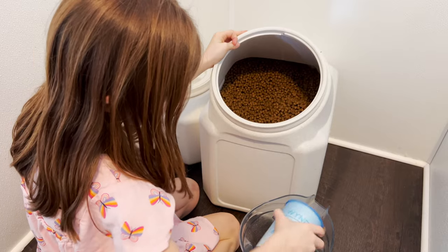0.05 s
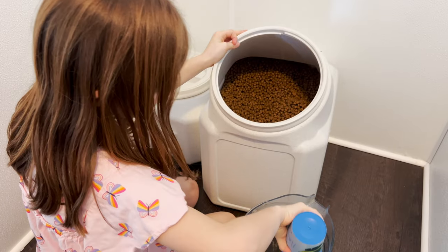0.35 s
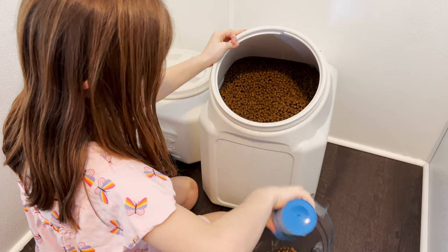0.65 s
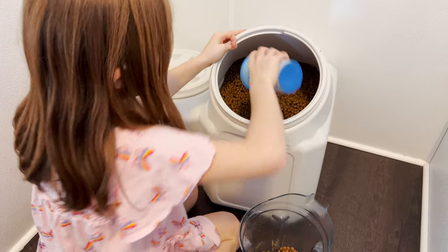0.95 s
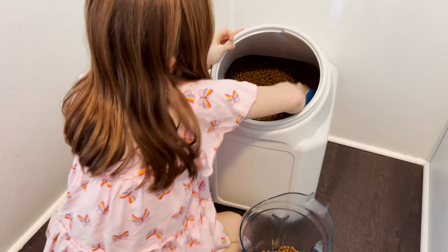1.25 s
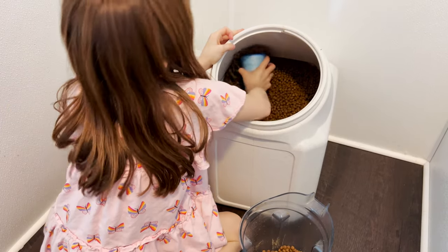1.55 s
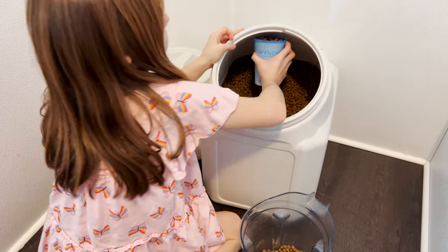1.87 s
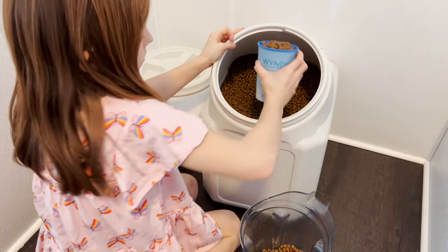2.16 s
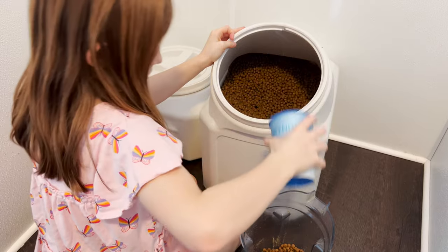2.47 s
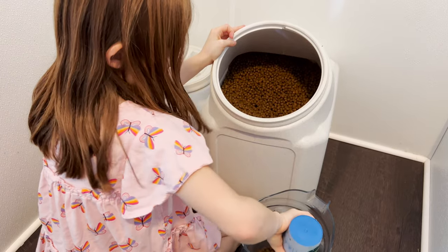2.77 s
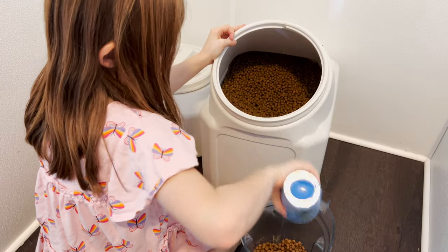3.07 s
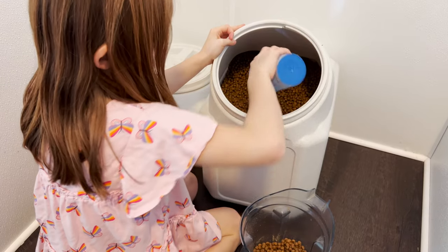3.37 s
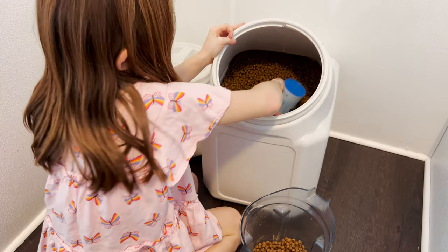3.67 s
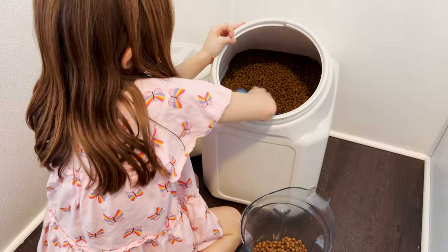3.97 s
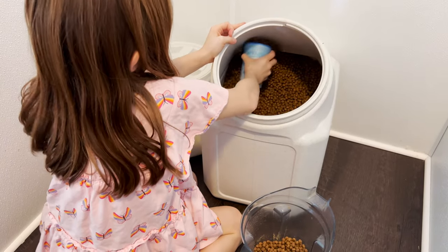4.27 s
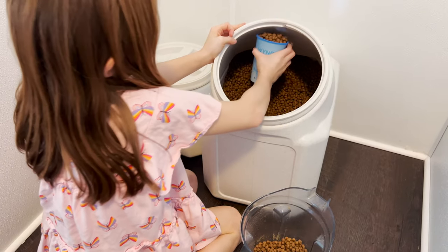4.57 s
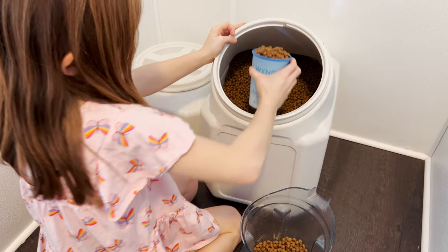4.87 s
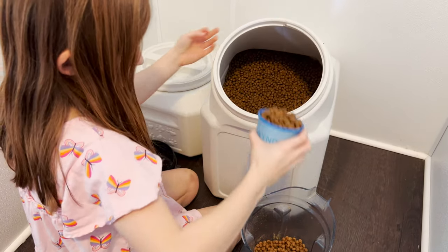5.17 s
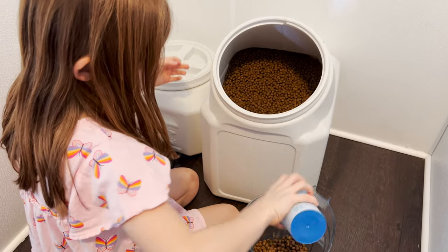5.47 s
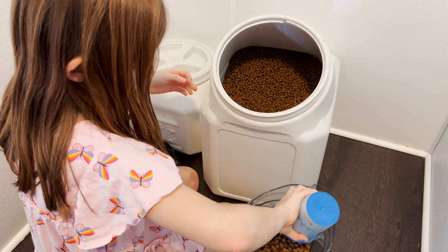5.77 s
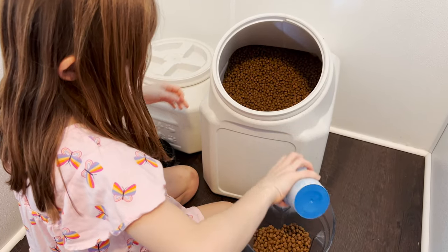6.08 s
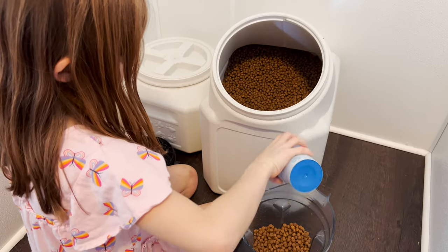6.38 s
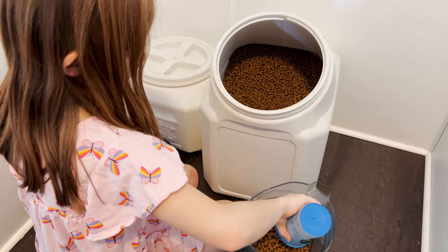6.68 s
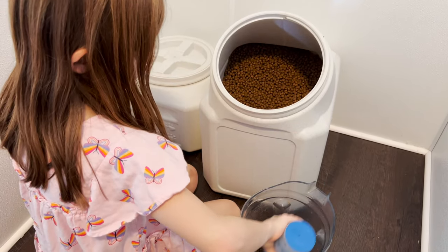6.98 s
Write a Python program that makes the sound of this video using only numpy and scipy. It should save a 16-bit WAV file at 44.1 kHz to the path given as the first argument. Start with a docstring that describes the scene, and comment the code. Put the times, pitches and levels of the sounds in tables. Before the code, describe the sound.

Sharp ticks lead into a clatter as dry kibble is tipped from a plastic cup into a blender jar. The cup digs into a big plastic bin with a hollow, booming crunch, then pours again; a second dig and a third pour follow. Stray pellets tick, and finally the cup knocks on the jar and grinds into the heap. The microphone is close, in a small hard-walled room.

```python
"""Sharp ticks, then a clatter: dry kibble tipped from a plastic cup into a blender jar, close to the
microphone in a small hard-walled room. A child pours three times; the pellets ring the jar and shake it
on the floor. Between pours the cup digs in a big plastic bin: the kibble crunches, the air in the cup
hoots and the bin booms. Stray pellets tick, and at the end the cup knocks on the jar and is pushed into
the heap."""
import sys
import numpy as np
from scipy import signal
from scipy.fft import next_fast_len
from scipy.io import wavfile
from scipy.ndimage import uniform_filter1d

SR = 44100
rng = np.random.default_rng(int(sys.argv[2]) if len(sys.argv) > 2 else 0)


def file_out(sig):
    """Save sig as 16-bit WAV at sys.argv[1]."""
    # one column per channel
    cols = np.atleast_2d(sig).T
    # limit, then scale
    lim = np.clip(cols, -1, 1)
    pcm = np.round(lim * 32767).astype(np.int16)
    wavfile.write(sys.argv[1], SR, pcm)


N = 318843
TIME = np.arange(N) / SR


def gain_of(db):
    return 10 ** (np.asarray(db) / 20)


def unit_energy(x):
    return x / (np.linalg.norm(x) + 1e-20)


def curve_at(points, hz):
    point_hz, value = np.transpose(points)
    return np.interp(np.log(hz + 1), np.log(point_hz + 1), value)


def add(mix, start_s, sound):
    part = mix[max(round(start_s * SR), 0):][:len(sound)]
    part += sound[:len(part)]


def coloured(x, colour):
    """Causal filter of unit energy with the given spectrum."""
    log_gain = np.log(gain_of(curve_at(colour, abs(np.fft.fftfreq(8192, 1 / SR)))))
    minimum_phase = np.exp(np.conj(signal.hilbert(log_gain)))
    taps = np.fft.ifft(minimum_phase).real[:4096]
    return signal.oaconvolve(x, unit_energy(taps))[:len(x)]


def resonate(x, hz, width_hz):
    """A resonance that follows hz and keeps the power of a white input."""
    turn = np.exp(2j * np.pi * np.cumsum(hz * np.ones(len(x))) / SR)
    pole = np.exp(-np.pi * width_hz / SR)
    return (turn * signal.lfilter([np.sqrt(2 * (1 - pole * pole))], [1, -pole], x / turn + 1e-18)).real


def brighten(x, treble_db, corner_hz=6000):
    """Harder contacts lift the treble."""
    dull = signal.sosfilt(signal.butter(1, corner_hz, fs=SR, output="sos"), x)
    return dull + gain_of(treble_db) * (x - dull)


def steadied(x, window=1800):
    """Holds the short-term power at 1, so that a level curve alone sets the loudness."""
    envelope = abs(signal.hilbert(x, next_fast_len(N))[:N])
    return x / np.sqrt(uniform_filter1d(envelope ** 2, size=window) / 2 + 1e-12)


def strokes(rows, column, swell_db, sag_db_per_s, release_db_per_s, onset_s=0.001):
    """Each row swells to the dB in the given column, sags while it is held, then is released."""
    power, t = np.zeros(N), np.arange(SR) / SR
    for row in rows:
        start_s, rise_s, hold_s = row[:3]
        db = (row[column] - swell_db * np.maximum(1 - t / rise_s, 0)
              - sag_db_per_s * np.clip(t - rise_s, 0, hold_s)
              - release_db_per_s * np.maximum(t - rise_s - hold_s, 0))
        add(power, start_s, (gain_of(db) * np.minimum(t / onset_s, 1)) ** 2)
    return np.sqrt(power)


def flows(rows, onset_s=0.0089, release_db_per_s=260):
    """Each thin flow of pellets starts softly, grows or fades steadily, then stops."""
    gain, t = np.zeros(N), np.arange(SR) / SR
    for start_s, length_s, db, growth in rows:
        shape_db = growth * np.minimum(t, length_s) - release_db_per_s * np.maximum(t - length_s, 0)
        add(gain, start_s, gain_of(db + shape_db) * np.minimum(t / onset_s, 1))
    return gain


def latest(rows):
    """For every moment, the row that began last and the seconds since it began."""
    rows = np.array(rows)
    current = rows[np.maximum(np.searchsorted(rows[:, 0], TIME) - 1, 0)]
    return current, np.maximum(TIME - current[:, 0], 0)


def lurches(per_s, depth_db=2.0):
    """Kibble sticks and gives way, so its push comes in uneven lumps."""
    knots = rng.standard_normal(1024)
    return gain_of(depth_db * np.interp(TIME * per_s, np.arange(len(knots)), knots))


def contact(hz, length_s, crack_db, damping=1.0, crack_s=0.00043):
    """One impact: an instant crack, then a clack around hz that swells and dies in milliseconds."""
    t = np.arange(2048) / SR
    snap, chatter = rng.standard_normal((2, len(t)))
    crack = unit_energy(snap * np.exp(-t / crack_s))
    chatter = chatter * np.exp(-t / length_s) * (1 - np.exp(-3 * t / length_s))
    clack = unit_energy(resonate(chatter, hz, damping * hz))
    return unit_energy(clack + gain_of(crack_db) * crack)


def impacts(per_s, spread_db):
    """Random impulses of uneven size, evened out to a steady mean power."""
    hits = rng.random(N) < per_s / SR
    sizes = gain_of(spread_db * np.minimum(rng.exponential(1, N), 4))
    train = hits * sizes * rng.choice([-1, 1], N)
    power = signal.oaconvolve(train ** 2, unit_energy(signal.windows.hann(1801)) ** 2, "same")
    return train / np.sqrt(abs(power) + 1e-4)


def pellets(train, length_s, crack_db, low_hz=1500, high_hz=7000, count=48):
    """Every impulse sounds one of many differently sized pellets."""
    pitches = np.geomspace(low_hz, high_hz, count)
    kinds = [contact(hz, length_s, crack_db, damping=0.62) for hz in pitches]
    which, out = rng.integers(0, count, N), np.zeros(N)
    for i in np.flatnonzero(abs(train) > 1e-7):
        add(out, i / SR, train[i] * kinds[which[i]])
    return out


def rumble(colour):
    """A large wall shaken by countless small blows."""
    return steadied(coloured(rng.standard_normal(N), colour))


# The empty room at the microphone. Each row: frequency in Hz, level in dB.
# Levels in all tables are relative: each function sets its own overall gain.
ROOM_TONE_COLOUR = [(15, -36.5), (25, -11), (63, -3.5), (130, -14), (416, -15.5), (754, -18), (840, -23.5),
                    (1840, -24.5), (3920, -33), (4740, -35), (9840, -50), (12200, -37), (16000, -51)]


def room_tone():
    """A faint, steady, bass-heavy hush under everything."""
    return gain_of(-69.5) * coloured(rng.standard_normal(N), ROOM_TONE_COLOUR)


# The small room's decay. Each row: frequency in Hz, seconds to fall 60 dB.
ROOM_DECAY = [(60, 0.94), (200, 0.72), (500, 0.65), (1300, 0.71), (3500, 0.48), (8000, 0.45), (15000, 0.31)]


def echoes(x, build_s=0.0004):
    """Close bare walls: a dense tail that builds quickly and dies band by band."""
    hz, t, spectrum = signal.stft(rng.standard_normal(SR), SR, nperseg=256)
    decay = gain_of(-60 * t / curve_at(ROOM_DECAY, hz)[:, None])
    tail = signal.istft(spectrum * decay, SR, nperseg=256)[1]
    build = 1 - np.exp(-np.arange(len(tail)) / SR / build_s)
    return signal.fftconvolve(x, unit_energy(tail * build))[:N]


def room(x, wet_db):
    """Direct sound and echoes meet at the microphone, at the same total power."""
    wet = gain_of(wet_db)
    return (x + wet * echoes(x)) / np.sqrt(1 + wet ** 2)


# The tone of lone pellets on plastic. Each row: frequency in Hz, level in dB.
PELLET_COLOUR = [(150, -37), (600, 3), (1000, 2), (1800, 3), (4000, 2), (7000, 1), (10000, -5.5),
                 (12500, -0.5), (16000, -7.5)]
# Inside the carried cup. Each row: start and length in seconds, level in dB, growth in dB per second.
CUP_SHIFTS = [(1.8, 0.085, -51, -62), (4.38, 0.68, -51.5, -37.5), (5.88, 0.16, -65.5, 27),
              (6.46, 0.041, -67, -20)]


def settling():
    """Pellets shift in the carried cup with a faint, sparse ticking."""
    train = impacts(per_s=150, spread_db=3) * flows(CUP_SHIFTS)
    ticking = pellets(train, length_s=0.0015, crack_db=-9, low_hz=2600, high_hz=12940)
    return gain_of(-7) * coloured(ticking, PELLET_COLOUR)


# After a pour or a dig. Each row: start and length in seconds, level in dB, growth in dB per second.
LATE_DROPS = [(0.5, 0.15, -43, -50), (2.88, 0.1, -35, -110), (4.5, 0.25, -63.5, -30.5),
              (6.33, 0.22, -67, -12.5)]


def stragglers():
    """A few late pellets drop and bounce one by one."""
    train = impacts(per_s=60, spread_db=2) * flows(LATE_DROPS)
    drops = pellets(train, length_s=0.0028, crack_db=-14.5, low_hz=2240, high_hz=3550)
    return gain_of(-2) * coloured(drops, PELLET_COLOUR)


# Down at the floor, the jar rocks. Each row: start in seconds, level in dB, pitch in Hz.
JAR_THUMPS = [(2.781, -32, 70), (5.449, -59, 80), (6.032, -55, 85.5), (6.706, -44, 78.3),
              (6.751, -41, 80.8), (6.915, -43, 81), (7.107, -30.5, 76.7), (7.132, -33.5, 158),
              (7.158, -30.5, 88.5)]


def thumps(rise_s=0.002, t60_s=0.22):
    """The base of the jar bounces on the floor: a low, softly starting ring."""
    out, t = np.zeros(N), np.arange(SR // 2) / SR
    for start_s, db, hz in JAR_THUMPS:
        envelope = gain_of(db - 60 * t / t60_s) * (1 - np.exp(-t / rise_s))
        add(out, start_s, envelope * np.sin(2 * np.pi * hz * t))
    return out


# The loudest single pellets, heard close, and one short scrape of the cup's rim at 3.705 s as the second dig
# begins. Each row: start in seconds, level in dB, pitch of the clack # in Hz, sharp crack against the clack in
# dB.
PELLET_HITS = [(0.0064, -18, 2400, -7.5), (0.0364, -19, 2290, 3), (0.0763, -22.5, 2340, 2.5),
               (0.1124, -16.5, 2830, 3.5), (0.1838, -16.5, 3000, 9), (0.5613, -24.5, 2660, 9),
               (0.6769, -36.5, 2730, -28), (1.7558, -27, 5300, -1), (1.9802, -38.5, 4530, -23),
               (2.458, -45.5, 2580, -5.5), (2.783, -21.5, 2870, -7), (2.972, -32, 2200, -1),
               (3.3978, -64, 2030, -5.5), (3.705, -23.5, 3760, -35), (4.237, -26, 12100, -17),
               (4.4655, -34.5, 3180, -6), (4.4816, -35, 2980, 1), (4.6085, -41, 2500, -3),
               (4.6442, -45, 3180, -6), (4.7182, -42.5, 12500, -11), (4.906, -49.5, 13000, -23),
               (5.095, -24, 3420, 0), (5.444, -28.5, 2870, -4.5), (5.553, -35.5, 2820, -3),
               (5.6109, -20.5, 2100, 6.5), (6.0568, -22, 8640, -16), (6.173, -44.5, 2880, -14),
               (6.2415, -43, 2660, -19), (6.3017, -44, 2720, -27), (6.4225, -54, 2720, -8),
               (6.4517, -49.5, 2880, -10), (6.9224, -41.5, 2040, -10), (6.98, -41.5, 3020, -21),
               (7.1592, -36.5, 2460, -1), (7.19, -33.5, 2960, -26)]


def ticks():
    """Single pellets hit the cup, the bin or the jar, and the cup's rim scrapes once; the walls return each as
    a diffuse wash."""
    direct, to_walls = np.zeros((2, N))
    impulse = signal.unit_impulse(512)
    for start_s, db, hz, crack_db in PELLET_HITS:
        tick = contact(hz, length_s=0.0028, crack_db=crack_db, damping=0.36, crack_s=0.00023)
        add(direct, start_s, gain_of(db) * tick)
        smooth_tick = unit_energy(resonate(impulse, hz, 1.7 * hz)) + gain_of(crack_db) * impulse
        add(to_walls, start_s, gain_of(db) * unit_energy(smooth_tick))
    return coloured(gain_of(10.5) * direct + gain_of(6) * echoes(to_walls), PELLET_COLOUR)


# The tone of the cup working in the jar, and of the jar on the floor.
# Each row: frequency in Hz, level in dB.
GRIND_COLOUR = [(150, -35), (400, 6.5), (650, 4), (1200, -4.5), (2000, -6), (3000, -1), (4500, -5),
                (7000, -11.5), (10000, -20), (16000, -20)]
THUD_COLOUR = [(20, -40), (45, -10), (62, -6.5), (82, 3.5), (112, -11.5), (165, -5), (240, -14), (450, -25),
               (1000, -65.5)]
# In the jar, at the end. Each row: start, rise and hold in seconds, then crunch and thud in dB.
CUP_PRESSES = [(6.668, 0.011, 0.023, -61.5, -52.5), (6.91, 0.022, 0.066, -55, -44.5),
               (7.008, 0.016, 0.059, -32.5, -46), (7.1, 0.013, 0.1, -53, -42.5)]


def press():
    """The cup grinds into the heap in the jar, which rumbles on the floor."""
    train = impacts(per_s=1300, spread_db=3.5)
    grind = strokes(CUP_PRESSES, column=3, swell_db=9, sag_db_per_s=2, release_db_per_s=309)
    crunch = coloured(pellets(train * grind, length_s=0.0018, crack_db=-3), GRIND_COLOUR)
    shake = strokes(CUP_PRESSES, column=4, swell_db=17, sag_db_per_s=26, release_db_per_s=90)
    return gain_of(-5.5) * (crunch + rumble(THUD_COLOUR) * shake)


# The struck jar. Each row: frequency in Hz, level in dB, seconds to fall 60 dB.
JAR_MODES = [(243, -17, 0.25), (354.4, -6.5, 0.22), (575, -4, 0.15), (653, 0, 0.037), (820, -29, 0.077),
             (2130, -8, 0.034), (2190, -9, 0.069), (2596, 2, 0.029), (3240, 1, 0.042), (4667, -19, .1)]
# The cup against the jar. Each row: start in seconds, level in dB, pitch of the blow in Hz.
CUP_KNOCKS = [(6.666, -34, 744), (6.908, -31.5, 356)]


def knocks(focus_db_per_octave=5):
    """Each blow of the cup rings the jar, most strongly in the modes near its own pitch."""
    out, t = np.zeros(N), np.arange(SR // 2) / SR
    for start_s, db, blow_hz in CUP_KNOCKS:
        ring = np.zeros(len(t))
        for hz, mode_db, t60_s in JAR_MODES:
            struck_db = mode_db - focus_db_per_octave * abs(np.log2(hz / blow_hz))
            ring += gain_of(struck_db - 60 * t / t60_s) * np.sin(2 * np.pi * hz * t)
        blow = contact(blow_hz, length_s=0.0058, crack_db=0.5, crack_s=0.00076)
        add(out, start_s, gain_of(db - 5) * ring)
        add(out, start_s, gain_of(db + 12) * coloured(blow, GRIND_COLOUR))
    return out


# The rim scraping into kibble, in the bin and in the jar. Each row: start, rise and hold in seconds,
# hoot and upper mode in dB, starting pitch in Hz.
BIN_SCRAPES = [(1.21, 0.003, 0.23, -33.5, -29.5, 672), (3.673, 0.052, 0.203, -34.5, -50, 690),
               (4.02, 0.013, 0.028, -36.5, -34, 580)]
JAR_SCRAPES = [(7.02, 0.044, 0.016, -43, -40.5, 342)]


def cup_air(scrapes, covered_hz, width_hz, upper_ratio, cover_s=0.097):
    """The scraping rim makes the cup's air hoot; a broader, higher mode grows until the scrape ends."""
    current, since_s = latest(scrapes)
    scrape, rasp = rng.standard_normal((2, N))
    # The pitch settles as kibble covers the mouth of the cup.
    hz = covered_hz + (current[:, 5] - covered_hz) * np.exp(-(since_s / cover_s) ** 2)
    hoot = steadied(resonate(resonate(scrape, hz, width_hz), hz, 4 * width_hz), window=900)
    hoot *= strokes(scrapes, column=3, swell_db=9, sag_db_per_s=19.5, release_db_per_s=228.5)
    growing = [(start_s, rise_s + hold_s, 0, db) for start_s, rise_s, hold_s, _, db, _ in scrapes]
    upper = steadied(resonate(resonate(rasp, upper_ratio * hz, 260), upper_ratio * hz, 520))
    upper *= strokes(growing, column=3, swell_db=22.5, sag_db_per_s=0, release_db_per_s=233.5)
    return hoot + gain_of(-4) * upper


# At the bin: the tone of its kibble, its wall and its boom. Each row: frequency in Hz, level in dB.
CRUNCH_COLOUR = [(150, -29), (400, -2.5), (600, 4), (850, 5), (1300, -1.5), (2600, 1), (4500, -1.5),
                 (7000, -6.5), (10000, -13), (12000, -10), (16000, -19)]
WALL_COLOUR = [(80, -34), (180, -8), (235, 2), (290, -3.5), (370, -1), (480, -6), (700, -11), (1500, -62)]
BOOM_COLOUR = [(20, -41.5), (40, -15.5), (75, -8.5), (100, -6.5), (128, 5.5), (160, -9.5), (200, -12.5),
               (400, -57.5), (1000, -82.5)]
# The cup bumping the bin wall. Each row: start, rise and hold in seconds, level in dB.
WALL_BUMPS = [(1.47, 0.0089, 0.023, -39.5), (1.585, 0.011, 0.016, -35.5), (1.757, 0.0054, 0.012, -39),
              (1.785, 0.0053, 0.012, -41), (4.29, 0.011, 0.019, -36.5)]
# The cup shoved through the bin. Each row: start, rise and hold in seconds, then crunch, wall, boom
# and extra treble in dB.
CUP_SHOVES = [(1.206, 0.002, 0.14, -46.5, -53, -43.5, 14.5), (1.289, 0.085, 0.16, -40, -46, -43, 5),
              (1.498, 0.077, 0.017, -31, -44, -48, 9.5), (1.611, 0.024, 0.081, -41, -51, -50, -8),
              (1.715, 0.045, 0.043, -49.5, -48.5, -46.5, 4), (1.973, 0.0067, 0.0067, -50, -51, -63, -8),
              (3.668, 0.05, 0.048, -49, -52, -42, 6), (3.789, 0.023, 0.12, -43.5, -49, -46, 0),
              (3.998, 0.035, 0.11, -39, -41.5, -42.5, 3), (4.165, 0.12, 0.011, -35.5, -44, -50.5, 6),
              (4.321, 0.037, 0.11, -49.5, -51.5, -52, 0)]


def digs():
    """Pellets slip past the rim of the cup; the shoved heap works the walls of the bin."""
    train = impacts(per_s=1100, spread_db=4)
    slip = strokes(CUP_SHOVES, column=3, swell_db=12.5, sag_db_per_s=27.5, release_db_per_s=209)
    grains = pellets(train * slip, length_s=0.0057, crack_db=-6, low_hz=835, high_hz=5800)
    start_s, rise_s, *_, treble_db = np.transpose(CUP_SHOVES)
    crunch = brighten(coloured(grains, CRUNCH_COLOUR), np.interp(TIME, start_s + rise_s, treble_db))
    load = strokes(CUP_SHOVES, column=4, swell_db=20.5, sag_db_per_s=2.5, release_db_per_s=196)
    bumps = strokes(WALL_BUMPS, column=3, swell_db=4, sag_db_per_s=101, release_db_per_s=502.5)
    wall = rumble(WALL_COLOUR) * np.hypot(load, bumps)
    heave = strokes(CUP_SHOVES, column=5, swell_db=19.5, sag_db_per_s=5.5, release_db_per_s=186.5,
                    onset_s=0.02)
    boom = gain_of(1.5) * rumble(BOOM_COLOUR) * heave
    return gain_of(-2.5) * crunch + (wall + boom) * lurches(per_s=35)


# The tone of kibble landing in the jar. Each row: frequency in Hz, level in dB.
CLATTER_COLOUR = [(100, -26.5), (250, -12), (420, -3), (700, -4), (950, -9), (1300, -5), (2000, -5),
                  (3000, -2), (4500, -6.5), (7000, -7), (10000, -11.5), (12000, -8), (16000, -18)]
# The jar wall, stirred by the clatter. Each row: frequency and width in Hz, level in dB.
JAR_RESONANCES = [(1288, 25, -5), (1587, 50, -8.5), (1810, 150, -24.5), (2500, 60, -19.5),
                  (2780, 200, -8.5)]
# Over the lip of the tilted cup. Each row: start and length in seconds, level in dB, growth in dB
# per second.
LIP_TRICKLES = [(0.0, 0.3, -41.5, 10.5), (2.635, 0.095, -56, 126.5), (5.47, 0.23, -59.5, 58)]
# The bulk of a cupful landing, close to the microphone. Each row: start, rise and hold in seconds,
# then clatter, thud on the floor and hollow of the jar in dB.
CUPFULS = [(0.249, 0.012, 0.22, -26, -46.5, -50), (2.772, 0.029, 0.053, -26, -45, -42),
           (5.607, 0.024, 0.036, -34, -47.5, -55), (5.695, 0.026, 0.014, -29.5, -47.5, -40.5)]


def pours(fresh_db=12.5, dull_db=-6, dull_s=0.025, hollow_hz=564, hollow_lag_s=0.012):
    """Pellets rain on the jar and the heap, ring its wall and its hollow, and shake it on the floor."""
    rush = strokes(CUPFULS, column=3, swell_db=13.5, sag_db_per_s=43, release_db_per_s=239.5,
                   onset_s=0.0039)
    trickle = flows(LIP_TRICKLES)
    bulk = pellets(impacts(per_s=850, spread_db=4) * rush, length_s=0.0027, crack_db=-1.5)
    loose = pellets(impacts(per_s=420, spread_db=4) * trickle, length_s=0.0027, crack_db=-1.5)
    # A rush lands bright and dulls as the heap cushions it.
    _, since_s = latest(CUPFULS)
    treble_db = dull_db + (fresh_db - dull_db) * np.exp(-since_s / dull_s)
    clatter = coloured(brighten(bulk, treble_db) + brighten(loose, treble_db=0.5), CLATTER_COLOUR)
    ring = sum(gain_of(db) * resonate(bulk + loose, hz, width) for hz, width, db in JAR_RESONANCES)
    # The air in the jar builds up after the pellets land.
    air = resonate(resonate(rng.standard_normal(N), hollow_hz, width_hz=30), hollow_hz, width_hz=60)
    stirred = strokes(CUPFULS, column=5, swell_db=14.5, sag_db_per_s=7, release_db_per_s=398.5)
    stirred += gain_of(-8.5) * trickle
    hollow = steadied(air) * np.interp(TIME - hollow_lag_s, TIME, stirred) * lurches(per_s=25)
    shake = strokes(CUPFULS, column=4, swell_db=10.5, sag_db_per_s=8.5, release_db_per_s=195.5)
    thud = rumble(THUD_COLOUR) * (shake + gain_of(-20) * trickle)
    return gain_of(-1.5) * clatter + gain_of(-19) * ring + hollow + gain_of(-3.5) * thud


def scene():
    """The jar, the bin and stray pellets, near one microphone in a small room."""
    in_jar = pours() + press() + knocks()
    in_jar += cup_air(JAR_SCRAPES, covered_hz=400, width_hz=18, upper_ratio=1.93)
    in_bin = digs()
    in_bin += gain_of(-2.5) * cup_air(BIN_SCRAPES, covered_hz=561, width_hz=61.4, upper_ratio=1.72)
    hush = room_tone()
    kibble = room(in_jar + in_bin + settling() + stragglers(), wet_db=-7)
    return (kibble + ticks() + thumps() + hush)[None]


def record(dry, bass_hz=36, edge_hz=15950):
    """The microphone's bass roll-off and the band limit of the recorder."""
    thinned = signal.sosfilt(signal.butter(2, bass_hz, "high", fs=SR, output="sos"), dry)
    band_limit = signal.firwin(511, edge_hz, window=("kaiser", 9), fs=SR)
    return signal.oaconvolve(thinned, band_limit[None], "same")


dry = scene()
out = record(dry)
file_out(out)
```